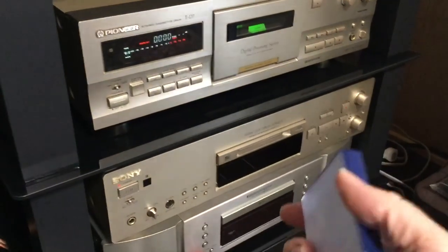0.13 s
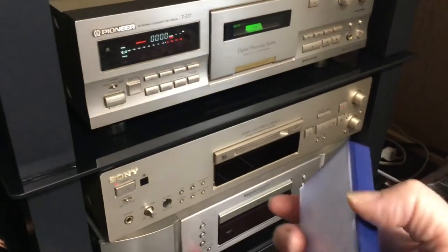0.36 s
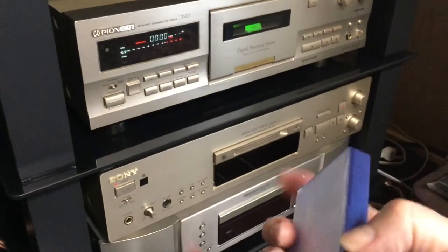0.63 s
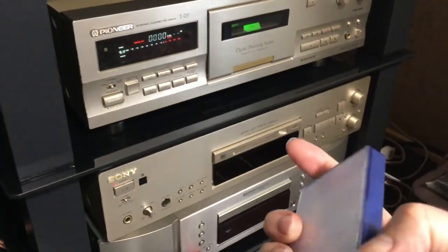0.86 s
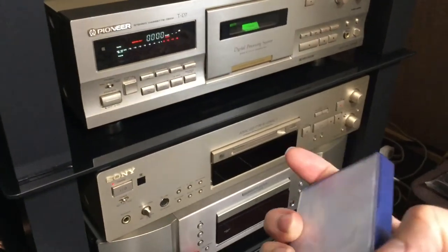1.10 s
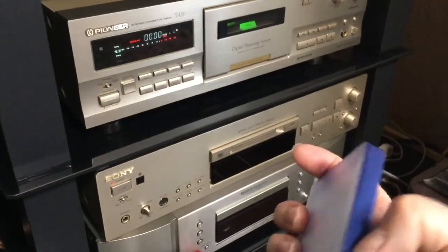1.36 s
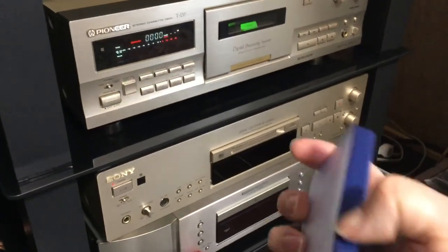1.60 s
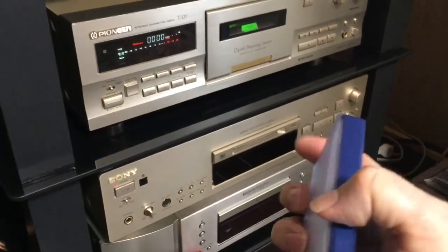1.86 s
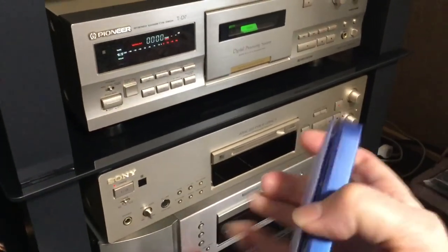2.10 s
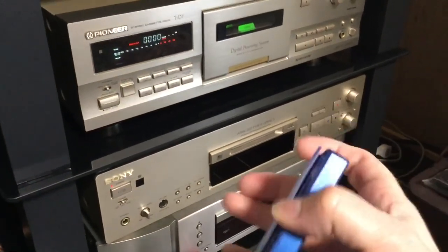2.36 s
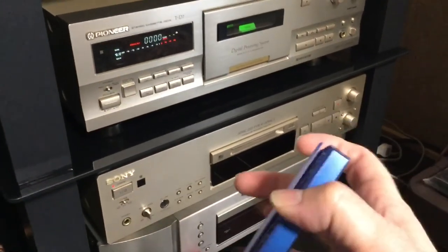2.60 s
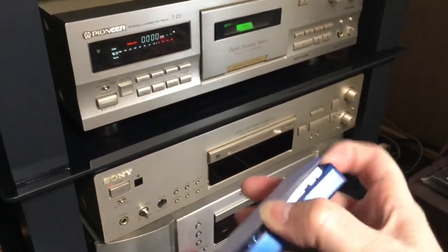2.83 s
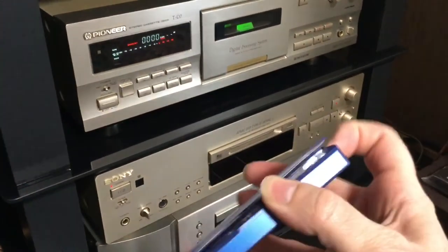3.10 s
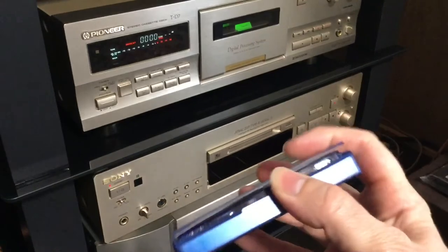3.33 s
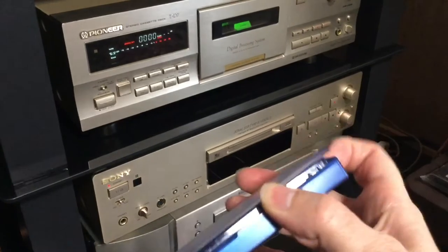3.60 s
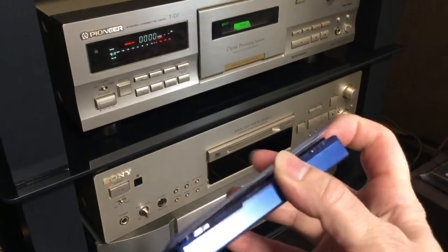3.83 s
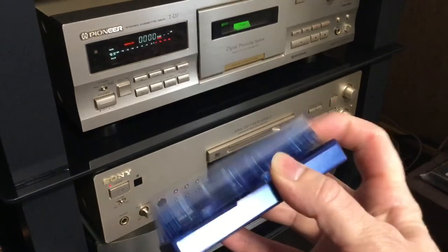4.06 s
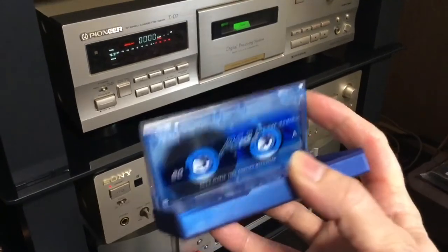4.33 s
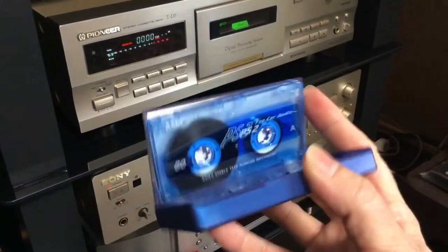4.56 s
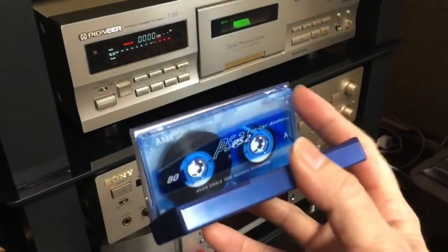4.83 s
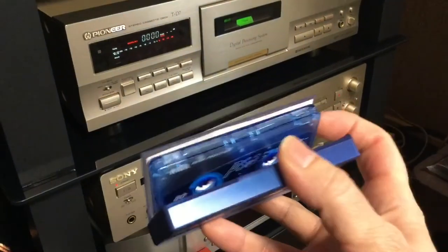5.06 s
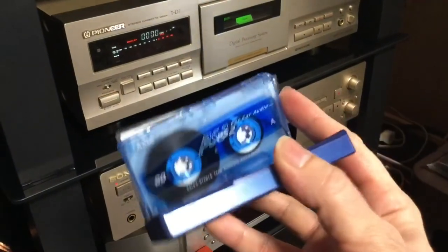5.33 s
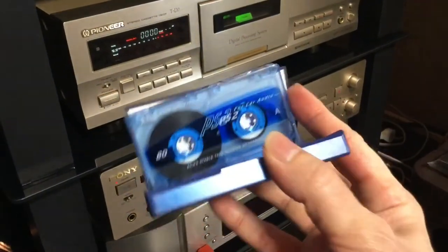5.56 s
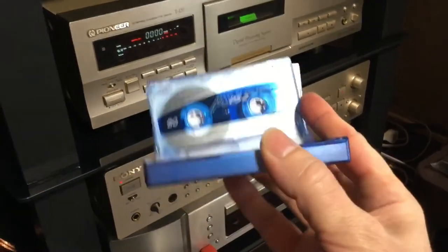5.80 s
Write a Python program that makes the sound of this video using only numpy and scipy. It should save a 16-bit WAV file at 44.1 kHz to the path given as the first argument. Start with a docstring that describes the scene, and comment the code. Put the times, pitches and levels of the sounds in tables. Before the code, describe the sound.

A hinged plastic cassette case is handled close up in a quiet small room, with faint rubs, rattles and several hard, sharp snaps.

```python
"""Plastic cassette case in the hand

A hand turns and opens a hinged plastic cassette case close to a microphone in a small quiet room.
Contacts ring the modes of the hollow shell and stiff edges and add a noise crack; the cassette rattles inside.
Shaped noise grains make the slides of skin and plastic, decaying sines the low thumps and the pings.
The loudest snaps clip; a low room hum and a faint hiss, both of coloured noise, lie underneath."""
import sys
import numpy as np
from scipy import signal
from scipy.fft import rfft, irfft, next_fast_len
from scipy.io import wavfile
from scipy.ndimage import uniform_filter1d

SR = 44100
rng = np.random.default_rng(int(sys.argv[2]) if len(sys.argv) > 2 else 0)


def makeup_ratio(level_db):
    """Linear amplitude ratio for a level in decibels (20 dB per factor of ten)."""
    decades = np.asarray(level_db, float) / 20
    return 10 ** decades


def bounce(signal):
    """Save signal as a 16-bit WAV file at the path given by the first command-line argument."""
    frames = np.transpose(np.atleast_2d(signal))
    limited = np.clip(frames, -1, 1)
    pcm = np.round(limited * 32767).astype(np.int16)
    wavfile.write(sys.argv[1], SR, pcm)


N = 261749  # samples

# modes of the hollow shell: pitch_hz, relative_level_db, t60_s
SHELL_MODES = [(675, -12.5, 0.017), (842, -17, 0.11), (970.2, -3.5, 0.063), (1115, 11.5, 0.019),
               (1158, -9, 0.095), (1218, 1.5, 0.035), (1407, 2, 0.025), (1537, 0.5, 0.0095)]
# modes of the stiff edges and the cassette: pitch_hz, relative_level_db, t60_s
EDGE_MODES = [(1676, -1, 0.023), (1934.5, 2.5, 0.022), (2066, 2, 0.013), (2400, -12.5, 0.096),
              (2480, -1.5, .022), (2710, 0.5, 0.014), (3096, -8, 0.0338), (4530, -12, 0.067),
              (4840, -18.5, 0.011)]
# colour of cracks and hiss at the microphone, with its notch: frequency_hz, relative_level_db
BRIGHT_COLOUR = [(2000, -36.5), (3800, 2), (5300, -1.5), (6800, -7.5), (7700, -11.5), (8800, -5),
                 (13400, -9), (15700, -27)]


def knocks():
    """Each contact chatters for a few ms, rings shell and edges, cracks, and gets its own room tail."""
    start_s, shell_db, edge_db, crack_db = contacts()[:, :, None]
    count = len(start_s)
    t = np.arange(SR // 16) / SR
    strongest_db = np.maximum(shell_db, edge_db)

    chatter_db = -33.5 + 10.73 * rng.standard_normal((count, 600)) - 60 * t[:600] / 0.012
    chatter = makeup_ratio(chatter_db) * rng.standard_normal((count, 600))
    chatter[:, 0] = 1  # the first touch leads

    # weaker contacts are softer: their attack grows as the level falls
    softness = makeup_ratio(-0.585 * strongest_db)
    # contacts with little crack leave the high modes still: dB per octave
    dull_db = 0.4 * np.maximum(edge_db - crack_db, 0)[:, :, None]

    def struck(modes, attack_at_0_db_s):
        touch = ring(modes, t, count, spread_db=6, detune=0.036, dull_db=dull_db)
        touch = touch * (1 - np.exp(-t / (attack_at_0_db_s * softness)))
        return peak_one(signal.fftconvolve(touch, chatter, axes=1)[:, :len(t)])

    shell = struck(SHELL_MODES, 0.00014)
    edges = struck(EDGE_MODES, 0.00006)
    crack = unit(coloured(rng.standard_normal((count, len(t))), BRIGHT_COLOUR))
    crack = crack * makeup_ratio(-60 * t / 0.024) * (1 - np.exp(-t / 0.00033))
    direct = makeup_ratio(shell_db + 1.0) * shell + makeup_ratio(edge_db + 2.0) * edges + makeup_ratio(crack_db - 1.5) * crack

    # the walls answer the first blow, heard from all sides, so single modes blur
    first_blow = direct * makeup_ratio(-60 * t / 0.03)
    with_room = makeup_ratio(-7.5) * diffuse(first_blow, tails(count), spread=0.075)
    with_room[:, :len(t)] += direct

    # pre-echo, no sound of the case: noise under 9 kHz smeared ahead of each contact, strongest before loud snaps
    time_to_go = t[:1300][::-1]
    echo_colour = [(400, -30.5), (1200, 3.0), (8800, -13.0), (9200, -57.5)]  # frequency_hz, relative_level_db
    smear = unit(coloured(rng.standard_normal((count, len(time_to_go))), echo_colour))
    pre_echo = makeup_ratio(1.4 * strongest_db - 25.5 - 60 * time_to_go / 0.04) * smear

    out = np.zeros(N + SR)
    starts = np.round(start_s[:, 0] * SR).astype(int)
    for start, sound in zip(starts, np.hstack([pre_echo, with_room])):
        out[start - len(time_to_go):][:len(sound)] += sound
    return out[:N]


def contacts():
    """Single knocks, then the loose cassette's rattles: hops unevenly spread over each one's length."""
    # single plastic contacts, levels before the mix trims: start_s, shell_db, edges_db, crack_db
    single = [(0.0985, -44, -65, -54), (0.113, -44, -53, -62), (0.141, -37, -53, -49),
              (0.355, -44.5, -53, -62), (0.548, -47, -54, -70), (0.5852, -39, -41.5, -54),
              (0.6325, -28.5, -37, -49), (0.886, -50, -56, -72), (1.131, -51, -54, -86),
              (1.2605, -28, -32.5, -49), (1.2663, -37, -38.5, -56), (1.322, -31.5, -37, -75),
              (1.354, -47, -54, -83), (1.3888, -48, -58.5, -77), (1.439, -49, -66, -74),
              (1.4765, -30.5, -43, -45.5), (1.5029, -9.5, -22.5, -46), (1.516, -27, -25, -42.5),
              (1.526, -34, -26.5, -60), (1.554, -48.5, -40.5, -73), (1.568, -37, -40, -71),
              (1.6047, -33, -43.5, -62), (1.725, 4.5, 3, -0.5), (1.7326, -2, -8.5, -12),
              (1.739, -10.5, -16, -25), (1.769, -20, -26.5, -40), (1.9213, -40, -56, -61),
              (2.0038, -37, -65, -71), (2.072, -33, -46, -59), (2.087, -23, -31, -30.5),
              (2.105, -14.5, -28.5, -35), (2.1135, -14.5, -28, -37), (2.1296, -29, -24, -54),
              (2.164, -23.5, -35, -58), (2.174, -27, -39, -54), (2.189, -24, -38, -45.5),
              (2.258, -38.5, -58, -50), (2.2962, -34, -51, -56), (2.313, -23.5, -59, -75.5),
              (2.36, -32, -47, -62), (2.3964, -47, -71, -75.5), (2.4902, -46.5, -57.5, -59.5),
              (2.5118, -48.5, -69, -68.5), (2.5583, -29.5, -36, -49.5), (2.6093, -20.5, -30.5, -28),
              (2.636, -26, -28, -34), (2.649, -24, -34, -38.5), (2.655, -22.5, -34, -40.5),
              (2.668, -34, -44, -48), (2.7714, -33, -54, -52), (2.864, -48.5, -47.5, -54),
              (2.9616, -26.5, -28, -28), (3.01, -38.5, -62, -65), (3.088, -29.5, -35, -53),
              (3.1242, -11, -4.5, -13.5), (3.1392, -16, -22, -34), (3.249, -1.5, -6, -6.5),
              (3.255, -4.5, 1.5, -13), (3.2592, -5.5, -10.5, -20.5), (3.268, -13.5, -33.5, -26),
              (3.285, -10.5, -27.5, -25.5), (3.5055, -38, -49, -59), (3.5158, -57, -53, -41.5),
              (3.5418, -34, -41, -52), (3.6224, -40, -55.5, -68), (3.7924, -42, -40.5, -43.5),
              (3.8139, -13, -1.5, -4.5), (3.8167, -23.5, -20.5, -24), (3.838, -16, -32.5, -48),
              (3.924, -26.5, -40, -52), (3.9334, -21.5, -33, -56), (3.997, -27, -33, -39),
              (4.0665, -28.5, -33.5, -71), (4.093, -33.5, -56, -75), (4.127, -43, -58.5, -74.5),
              (4.3528, -47, -52, -74), (4.4335, -36, -50.5, -42.5), (4.583, -36, -25.5, -55),
              (4.745, -82, -43.5, -53), (4.7947, -61.5, -49, -60), (4.9293, -30.5, -35.5, -41.5),
              (4.9359, -35, -41, -57), (4.994, -39, -64, -75), (5.003, -48, -65, -74),
              (5.036, -23.5, -28.5, -51.5), (5.041, -22, -31.5, -59), (5.121, -37, -43, -41.5),
              (5.127, -28.5, -64, -43), (5.137, -29, -27, -58), (5.142, -26, -33.5, -62),
              (5.152, -27, -29, -63), (5.1698, -27, -29.5, -39.5), (5.2034, -28, -31, -51.5),
              (5.212, -18, -37.5, -48), (5.431, -52.5, -71, -73.5), (5.528, -55.5, -71, -73.5)]
    # the loose cassette rattling in its shell, levels likewise: start_s, length_s, shell_db, edges_db, crack_db
    rattles = [(1.483, 0.014, -34.5, -42, -50), (2.025, .018, -38, -63, -56),
               (3.024, 0.014, -50.5, -38.5, -42.5), (3.039, .014, -28, -40.5, -50),
               (4.01, 0.011, -25, -34, -58.5), (4.569, .024, -37, -48, -52), (5.807, .01, -34, -36, -55.5)]
    hop_count = 5  # contacts in one rattle
    scatter_db, uneven = 6, 0.66  # spread of strength; full range of timing scatter as a share of the mean gap

    start_s, length_s, *levels_db = np.transpose(rattles)[:, :, None]
    chance = rng.standard_normal((len(start_s), hop_count, 4))
    hop = np.arange(hop_count)
    shift = uneven * np.tanh(chance[..., 0]) * (hop > 0) / 2  # the first hop stays in place
    place = (hop + shift) / (hop_count - 1)
    hops = [start_s + length_s * place]
    for k, db in enumerate(levels_db):
        hops.append(db + scatter_db * chance[..., k + 1])
    return np.hstack([np.transpose(single), np.reshape(hops, (4, -1))])


def slides():
    """Stick-slip grains under each stroke: fine ones hiss, coarse ones shake the shell."""
    # sliding strokes of skin and plastic, levels before the stroke's shape: start_s, length_s, hiss_db, scrape_db
    strokes = [(0.07, 0.053, -69, -47), (0.139, 0.025, -54, -37), (0.176, 0.053, -50.5, -41),
               (0.249, 0.067, -56.5, -52.5), (0.345, 0.038, -70, -69), (0.388, 0.142, -57.5, -48),
               (0.568, 0.047, -60, -55), (0.621, 0.037, -51, -39.5), (0.71, 0.043, -56.5, -44.5),
               (0.884, 0.0092, -82, -68), (1.467, 0.078, -65, -41), (1.523, 0.16, -80, -57),
               (1.894, 0.056, -62.5, -49), (2.019, 0.025, -65.5, -50.5), (2.067, 0.072, -40.5, -31),
               (2.139, 0.089, -58, -51), (2.289, 0.094, -68, -51), (2.475, 0.045, -68, -60),
               (2.602, 0.018, -50, -37.5), (2.614, 0.09, -68.5, -49.5), (2.737, 0.049, -70.5, -45.5),
               (2.863, 0.054, -64.5, -64), (3.012, 0.022, -56.5, -54.5), (3.503, 0.036, -60.5, -48),
               (3.584, 0.01505, -68, -51), (3.665, 0.13, -64.5, -57), (3.901, 0.035, -49, -40),
               (3.99, 0.065, -50.5, -39.5), (4.254, 0.0404, -71, -67), (4.306, 0.03, -61.5, -53.5),
               (4.423, 0.026, -61, -50), (4.558, 0.054, -73, -48.5), (4.744, 0.017, -55.5, -45),
               (4.788, 0.0218, -58.5, -66), (4.915, 0.034, -64.5, -45.5), (5.134, 0.035, -54.5, -43),
               (5.653, 0.03, -71.5, -69), (5.798, 0.038, -77, -44)]
    t = np.arange(N) / SR
    hiss_gain, scrape_gain = np.zeros((2, N))
    for start_s, length_s, hiss_db, scrape_db in strokes:
        u = np.clip((t - start_s) / length_s, 0, 1)
        stroke = 1.82 * u ** 0.64 * (1 - u) ** 0.58  # rounded, fullest near the middle
        hiss_gain += makeup_ratio(hiss_db) * stroke
        scrape_gain += makeup_ratio(scrape_db) * stroke

    fine = rng.standard_normal(N) * makeup_ratio(4.5 * rng.standard_normal(N))
    coarse = rng.standard_normal(N) * makeup_ratio(3.5 * rng.standard_normal(N))

    ring_t = np.arange(SR // 16) / SR

    def steady(modes):
        return ring(modes, ring_t, count=1, spread_db=0, detune=0, dull_db=11.5)

    body = steady(SHELL_MODES) + makeup_ratio(4) * steady(EDGE_MODES)
    hiss = hiss_gain * patchy(coloured(fine, BRIGHT_COLOUR), depth_db=3.5, size=(3, 8))
    shaken = signal.fftconvolve(coarse, body[0])[:N]
    scrape = scrape_gain * patchy(shaken, depth_db=2.5, size=(3, 4))
    direct = hiss + scrape
    return direct + makeup_ratio(-7.5) * signal.fftconvolve(direct, tails(count=1)[0])[:N]


def thumps():
    """Heavily damped low sines; each thump favours those near one pitch and fades the others by the octave."""
    # dull thumps, the 38 Hz one being the overload's push at the loudest snap: start_s, level_db, free_hz
    blows = [(1.502, -32.5, 312), (1.7258, -3, 550), (1.726, -2, 38), (1.725, -21, 172), (2.96, -35, 304),
             (3.121, -24, 312), (3.251, -19.5, 52), (3.817, -9.5, 220), (4.011, -23.5, 152),
             (4.929, -22, 220)]
    # low thump pitches; the lowest is the overload's push at the loudest snap: pitch_hz, relative_level_db, t60_s
    low_pitches = [(38, -2, 0.012), (70, -7, 0.021), (152, -2, 0.066), (220, -8.5, 0.027),
                   (312, -1.5, 0.079), (503, 0, 0.027), (620, 0.5, 0.02)]
    loss_db_per_octave = 25  # away from the free pitch

    t = np.arange(SR // 5) / SR
    hz, pitch_db, t60_s = np.transpose(low_pitches)[:, :, None]
    out = np.zeros(N + SR)
    for start_s, level_db, free_hz in blows:
        loss_db = loss_db_per_octave * np.abs(np.log2(hz / free_hz))
        level = makeup_ratio(level_db + pitch_db - loss_db - 60 * t / t60_s)
        attack = 1 - np.exp(-t * hz)
        thump = (level * np.sin(2 * np.pi * hz * t) * attack).sum(0)
        out[round(start_s * SR):][:len(t)] += thump
    return out[:N]


def pings():
    """One thin mode rings out after the touch."""
    # tiny bright pings, perhaps a fingernail on a thin edge: start_s, pitch_hz, level_db
    touches = [(0.887, 3960, -47), (1.263, 5760, -39.5), (3.125, 5420, -24.5)]
    t60_s = 0.022
    start_s, hz, level_db = np.transpose(touches)[:, :, None]
    age = np.maximum(np.arange(N) / SR - start_s, 0)
    return (makeup_ratio(level_db - 60 * age / t60_s) * np.sin(2 * np.pi * hz * age)).sum(0)


def room_rings():
    """The room's low resonances in the hum: narrow noise bands that swell and fade, each on its own."""
    # resonances, levels before the wavering: centre_hz, width_hz, level_db
    resonances = [(64.5, 16, -71), (115, 19, -68), (174.5, 29, -61.5), (263, 28, -66.5), (328, 36, -66.5)]
    waver_db, waver_hz = 4.5, 2.4
    centre_hz, width_hz, level_db = np.transpose(resonances)[:, :, None]
    f = np.fft.rfftfreq(N, 1 / SR)

    def band(centre, width):
        spectrum = rfft(rng.standard_normal((len(centre_hz), N)))
        return unit(irfft(spectrum * np.exp(-2 * ((f - centre) / width) ** 2), N))

    waver = makeup_ratio(level_db + waver_db * band(0, waver_hz))
    return (waver * band(centre_hz, width_hz)).sum(0)


def room_tone():
    """Hum and hiss of coloured noise; the level wanders a little in patches."""
    # colour of the quiet room: frequency_hz, relative_level_db
    tone_colour = [(15, -67.5), (30, -31.5), (45, -28), (63, -6.5), (85, -15.5), (174, -5.5), (340, -8.5),
                   (480, -24), (620, -18), (950, -23.5), (1390, -26), (2790, -35.5), (6500, -44),
                   (13400, -43), (14200, -76.5)]
    air = patchy(rng.standard_normal(N), depth_db=2.5, size=(3, 40))
    return makeup_ratio(-55) * unit(coloured(air, tone_colour))


def tails(count):
    """Room answers of energy 1, each frequency dying at its own speed, arriving 3 ms late."""
    # decay of the room's tail: frequency_hz, t60_s
    walls = [(300, 0.2), (1000, 0.18), (2500, 0.24), (6000, 0.18), (13000, 0.22)]
    hz, t, z = signal.stft(rng.standard_normal((count, SR // 4)), SR, nperseg=256)
    decay = makeup_ratio(-60 * t / along(walls, hz)[:, None])
    tail = signal.istft(z * decay, SR, nperseg=256)[1]
    tail = tail / np.linalg.norm(tail, axis=1, keepdims=True)
    return np.pad(tail, ((0, 0), (130, 0)))


def diffuse(blow, tail, spread):
    """Room tails coloured by each blow's spectrum, averaged over a share `spread` of the frequency."""
    m = next_fast_len(tail.shape[1] + 2048)
    energy = np.cumsum(np.abs(rfft(blow, m)) ** 2, 1)
    k = np.arange(energy.shape[1])
    lo = (k / (1 + spread)).astype(int)
    hi = np.minimum(k * (1 + spread) + 1, k[-1]).astype(int)
    colour = np.sqrt((energy[:, hi] - energy[:, lo]) / np.maximum(hi - lo, 1))
    return irfft(colour * rfft(tail, m), m)[:, :tail.shape[1]]


def ring(modes, t, count, spread_db, detune, dull_db=0):
    """One row per blow: modes at new strengths, pitches shifted by the grip, dull_db lost per octave over 2 kHz."""
    hz, db, t60_s = np.transpose(modes)[:, None, :, None]
    chance = rng.standard_normal((count, len(modes), 2))
    lost_db = dull_db * np.log2(np.maximum(hz / 2000, 1))
    level = makeup_ratio(db + spread_db * chance[..., :1] - lost_db - 60 * t / t60_s)
    pitch_hz = hz * (1 + detune * chance[..., 1:])
    return (level * np.sin(2 * np.pi * pitch_hz * t)).sum(1)


def patchy(x, depth_db, size):
    """Random gain patches, size (frequency bins, time frames), then scaled to rms 1."""
    z = signal.stft(x, nperseg=256)[2]
    field = uniform_filter1d(rng.standard_normal(z.shape), size[0], 0)
    field = uniform_filter1d(field, size[1], 1)
    gain = makeup_ratio(depth_db * field / field.std())
    return unit(signal.istft(z * gain, nperseg=256)[1][:len(x)])


def coloured(x, spectrum):
    """Filters x through a (Hz, dB) spectrum."""
    m = next_fast_len(x.shape[-1] + 8192)
    gain = makeup_ratio(along(spectrum, np.fft.rfftfreq(m, 1 / SR)))
    return irfft(rfft(x, m) * gain, m)[..., :x.shape[-1]]


def along(points, hz):
    """Interpolates (Hz, value) points on a log frequency axis."""
    f, v = np.transpose(points)
    return np.interp(np.log(hz + 1), np.log(f + 1), v)


def unit(x):
    """Scales to rms 1 along the last axis."""
    return x / np.sqrt(np.mean(x ** 2, -1, keepdims=True) + 1e-20)


def peak_one(x):
    """Scales each row to a peak of 1."""
    return x / np.abs(x).max(-1, keepdims=True)


def scene():
    """All sources at the microphone; the small case radiates no deep bass when it clicks."""
    high_pass = signal.butter(3, 560, "high", fs=SR, output="sos")
    clicks = signal.sosfilt(high_pass, knocks() + slides())
    return (clicks + thumps() + pings() + room_tone() + room_rings())[None]


def top_cut(x):
    """Nothing passes above the cut-off."""
    return signal.sosfilt(signal.butter(12, 15810, fs=SR, output="sos"), x)


def record(dry):
    """The converter clips the loudest snaps with a slightly rounded knee just under full scale."""
    clipped = dry / (1 + np.abs(dry / 0.99) ** 30) ** (1 / 30)
    return top_cut(clipped)


dry = scene()
out = record(dry)
bounce(out)
```